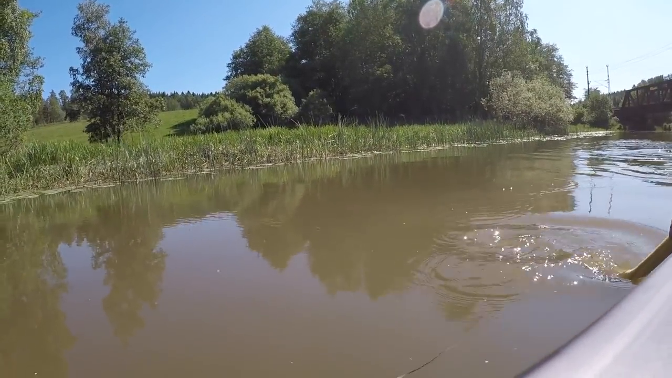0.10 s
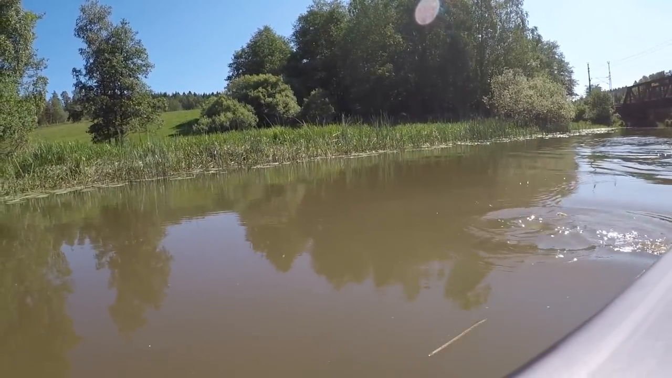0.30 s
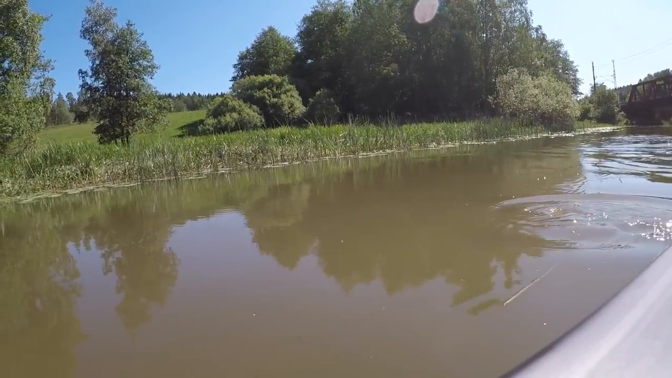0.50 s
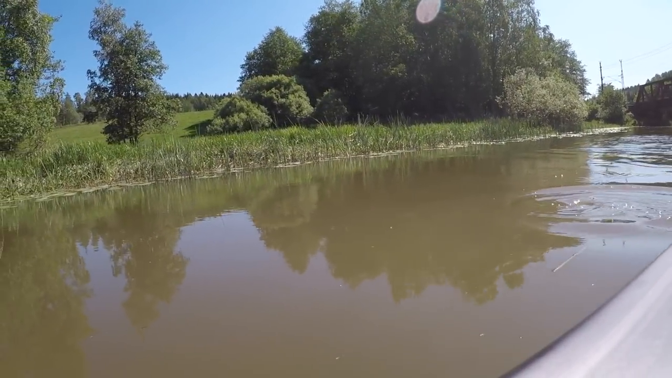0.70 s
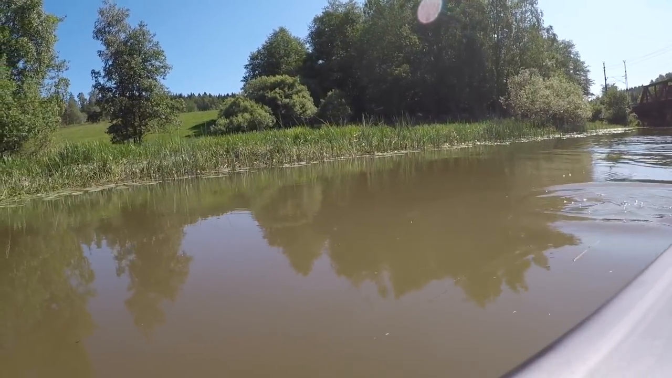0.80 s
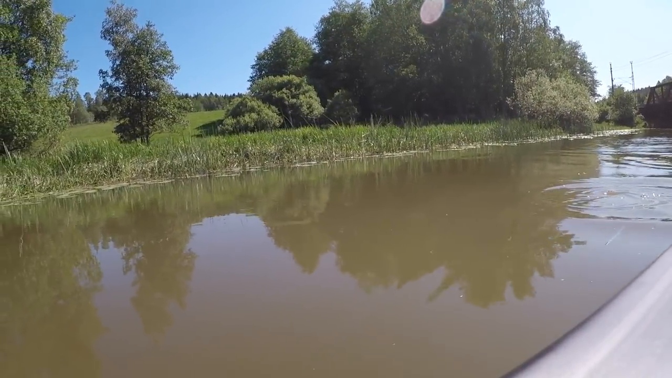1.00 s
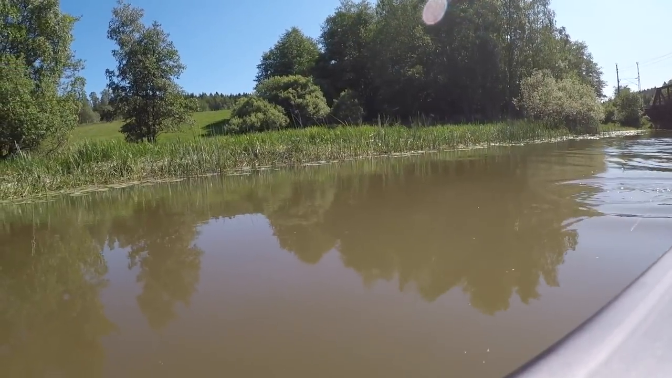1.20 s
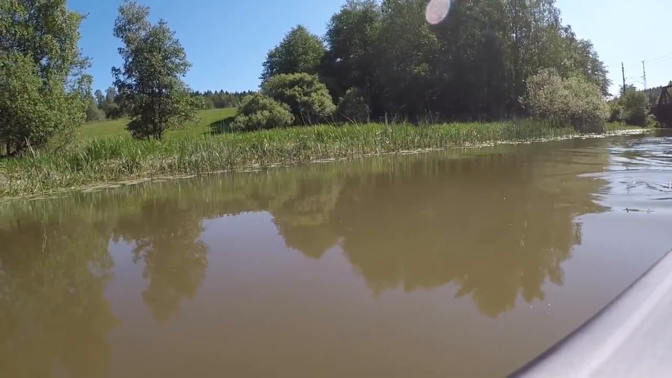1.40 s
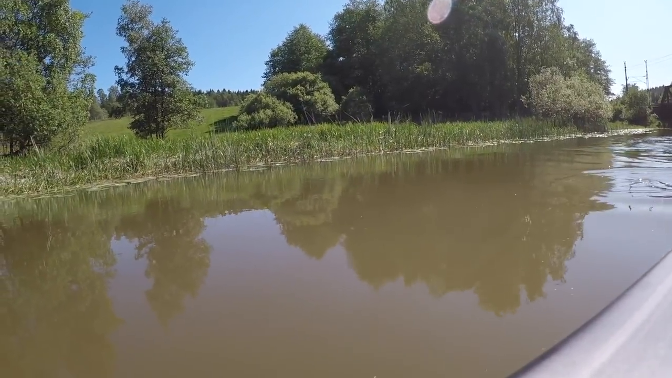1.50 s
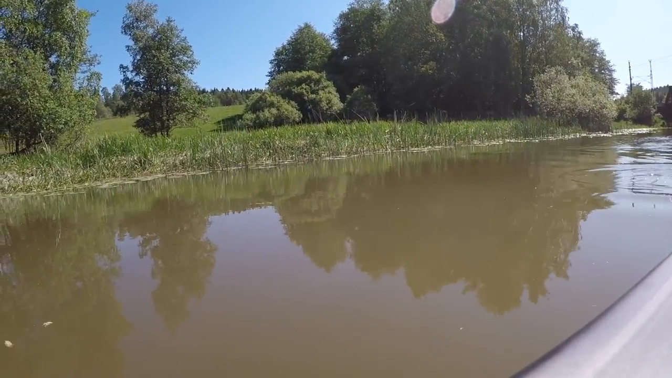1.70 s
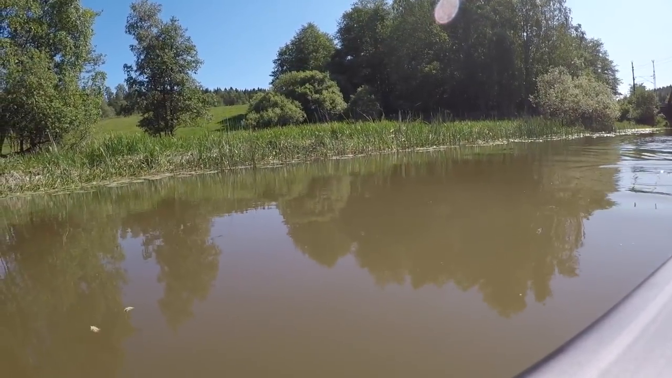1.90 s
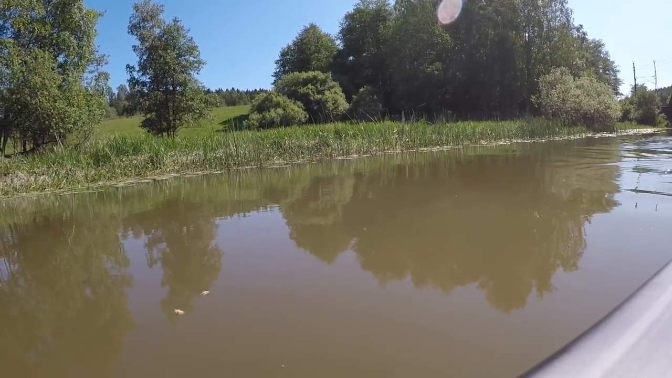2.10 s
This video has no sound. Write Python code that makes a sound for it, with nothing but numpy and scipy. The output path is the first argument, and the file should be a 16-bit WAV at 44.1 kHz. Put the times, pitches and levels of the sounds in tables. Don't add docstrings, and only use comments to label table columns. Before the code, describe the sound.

Paddle knock on a plastic canoe, heard close through the hull. Soft hiss, distant birds and faint touches until 0.25 s, when a hard crack booms hollowly and buzzes briefly; the hiss ducks, then slowly returns. From 0.33 to 0.64 s the shaft squeals low and rasps, then rubs bumpily, fading by 1.5 s. Duller taps at 1.65 and 1.8 s; faint chirps, low water slosh throughout.

```python
import sys
import numpy as np
from scipy import signal
from scipy.fft import rfft, irfft
from scipy.io import wavfile
from scipy.ndimage import uniform_filter1d

SR = 44100
rng = np.random.default_rng(int(sys.argv[2]) if len(sys.argv) > 2 else 0)


def invert_db(x):
    u = np.asarray(x, float) / 20
    return 10 ** u


def wav_record(signal):
    frames = np.transpose(np.atleast_2d(signal))
    bounded = np.clip(frames, -1, 1)
    quanta = np.round(bounded * 32767).astype(np.int16)
    wavfile.write(sys.argv[1], SR, quanta)


N = 92610

# f/Hz, level/dB, phase/rad
PORTS = [(95, -2.5, -.2), (150, -5, -.3), (228, -7, 2.0), (260, 0, 1.8), (330, -8, 1.6), (450, -7, 3.1),
         (560, -2.5, 3.05), (780, 0, 3.14), (1060, -1, 3.45), (1520, -2, 4.0)]
# f/Hz, left level/dB, t60/s
HULL_MODES = [(94, -10, 0.13), (143.9, -6.5, 0.13), (223.8, -1, 0.079), (260, -1.5, 0.078),
              (338.3, -7.5, 0.069), (434.3, 0.5, 0.027), (539, -8, 0.065), (608, -18, 0.12),
              (852, -13.5, 0.036), (1106, -20, 0.038), (1310, -16.5, 0.011), (1551, -30, 0.033),
              (1840, -25, 0.0067)]
# f/Hz, level/dB
AIR_MID = [(35, -62.5), (60, -65), (150, -4), (257, -1.5), (309, -6), (389, -6.5), (2190, -20), (9590, -26),
           (14900, -41.5)]
AIR_SIDE = [(35, -63.5), (60, -13), (120, -3), (295, 4), (407, -6.5), (489, 1), (832, -5.5), (9590, -26.5),
            (14900, -35)]
# t/s, level/dB, hardness/dB (lift of the modes above 400 Hz)
DRAG = [(0, -61, 0), (.2, -46.5, -10), (0.269, -58, 7), (0.309, -47, 6), (0.336, -26.5, 0),
        (0.598, -26.5, 9), (.78, -29.5, 4.5), (.84, -34.5, 3), (0.892, -28.5, 1), (1.03, -32.5, -5.5),
        (1.15, -38, 1.5), (1.3, -33.5, -4.5), (1.5, -46.5, -17), (1.6, -49, -6), (1.7, -37.5, -3),
        (1.851, -34, -2), (1.969, -55.5, -36), (2.1, -40.5, 7)]
# t/s, level/dB
SLOSH = [(0, -75), (.2, -63.5), (.25, -35.5), (.3, -49.5), (.45, -45.5), (.8, -49), (1.05, -41),
         (1.3, -45.5), (1.52, -42.5), (1.6, -53.5), (1.699, -44), (1.9, -52), (2.1, -60)]
# t/s, tap level/dB, tap f/Hz, boom level/dB, boom f/Hz
KNOCKS = [(.004, -37.5, 330, -36.5, 199), (.078, -47, 330, -41, 149.7), (.183, -42, 260, -36.5, 155.7),
          (0.233, -39, 524, -34, 154), (.2545, 1, 620, -3, 226), (0.245, -15.5, 440, -16, 148),
          (.265, -33, 1100, -23, 257), (0.295, -26.5, 610, -16.5, 206), (.327, -21, 617, -7.5, 234.8),
          (.332, -37, 557, -11, 222), (.603, -25, 514, -53, 159), (.632, -45, 560, -25.5, 269),
          (.66, -27.5, 506, -53, 257), (.725, -27, 610, -24, 243), (.962, -30, 530, -26, 254.6),
          (1.09, -48, 417, -43, 91.8), (1.198, -40, 420, -43, 267), (1.22, -40, 400, -39, 96),
          (1.512, -57, 400, -45.5, 85), (1.922, -52, 400, -35.5, 166), (0.391, -31, 507, -25, 232),
          (.415, -28, 510, -23, 226), (.442, -29, 507, -23.5, 245), (.543, -15, 495, -21, 246),
          (0.622, -24, 510, -25, 260.6), (0.678, -24, 480, -24.5, 257), (.748, -24.5, 564, -26, 237),
          (0.773, -24.5, 360, -39, 267), (0.867, -23, 820, -31.5, 93.2), (0.927, -20.5, 570, -33, 265),
          (0.991, -35, 507, -23.5, 240), (1.28, -35, 440, -33.5, 259), (1.302, -39, 450, -32.5, 259.5),
          (1.346, -38, 444, -34.5, 267), (1.437, -26.5, 432, -35.5, 264.6), (1.542, -42, 414, -38, 260),
          (1.6463, -12.5, 414, -14.5, 261), (1.652, -31, 480, -23, 254.3), (1.697, -25.5, 694, -27, 248),
          (1.8048, -16, 644, -22.5, 263.5), (1.806, -17, 455, -26, 150)]
# f/Hz, t60/s
BOOM_T60 = [(100, 0.23), (160, 0.063), (226, 0.078), (262, 0.1)]
# t/s, length/s, f/Hz, left level/dB, right level/dB
BRUSH = (.2465, .0045, 200, -20, -11)
# t/s, level/dB
RIM_RINGS = [
    (1.651, -48),
    (1.808, -56),
]
# t/s, length/s, start f/Hz, end f/Hz, level/dB, bend (over 1 glides early)
NEAR_BIRDS = [(.695, .03, 6200, 6200, -68, 1), (.985, .035, 6150, 6130, -63, 1),
              (1.02, .025, 6150, 6100, -68, 1), (1.045, .09, 5850, 5300, -62, 2.2),
              (1.297, .046, 6115, 6110, -51, 1), (1.33, .08, 6110, 6105, -63, 1),
              (1.409, .017, 5500, 6150, -60, 4), (1.426, .04, 5900, 4650, -59, .8),
              (1.46, .035, 5400, 5050, -66, 2), (1.567, .034, 4850, 5330, -62, 4),
              (1.596, .022, 5330, 5050, -62, .4), (1.624, .019, 3550, 2800, -58, 1.2),
              (1.49, .017, 2950, 3500, -62, 1)]
# t/s, length/s, start f/Hz, end f/Hz, level/dB
FAR_BIRDS = [
    (.01, 0.061, 6700, 6970, -63),
    (0.069, 0.048, 6100, 5110, -57.5),
    (1.22, 0.021, 3580, 3310, -63.5),
    (1.504, 0.021, 2870, 2540, -59),
    (1.666, 0.042, 6930, 7060, -64),
    (1.744, 0.088, 3870, 3520, -62),
    (1.799, 0.015, 3400, 3130, -60.5),
]
# t/s, length/s, f/Hz, level/dB, right phase/rad
DRONES = [
    (.45, .56, 4385, -75, 0),
    (1.24, .52, 968, -51, 2.3),
    (1.3, .8, 2255, -69, 0),
]
# t/s, f/Hz, left level/dB
SQUEAL = [
    (0.321, 531, -60),
    (0.334, 532, -24),
    (.44, 546.4, -19),
    (.498, 514.5, -22),
    (0.542, 510, -21),
    (0.554, 449.6, -22),
    (.57, 462, -16),
    (.586, 458, -27),
    (.64, 478, -34),
]
# ratio to the fundamental, level/dB
SQUEAL_OVERTONES = [(1.446, -13), (1.999, -25)]
# f/Hz, width/Hz, level/dB
RASP = [
    (970, 230, -57),
    (1568, 380, -57.5),
]

OPPOSED = np.array([[1], [-1]])


def walk(rate):
    k = int(SR / rate)
    held = np.repeat(rng.standard_normal(N // k + 1), k)
    return 1.31 * uniform_filter1d(uniform_filter1d(held, k), k)[:N]


def curve(x, table, column=1):
    rows = np.array(table).T
    return np.interp(x, rows[0], rows[column])


def bandpass(x, hz, order=4):
    return signal.sosfilt(signal.butter(order, hz, "band", fs=SR, output="sos"), x)


def pair(z, right_db, phase):
    return np.array([z.imag, (z * invert_db(right_db) * np.exp(1j * phase)).imag])


def felt(z, hz):
    return pair(z, curve(hz, PORTS), curve(hz, PORTS, 2))


def ring_hull(push, hard_db, deep_db=0):
    out = 0
    for hz, db, t60 in HULL_MODES:
        turn = np.exp(2j * np.pi * hz / SR)
        soft = np.exp(-hz / SR / 0.72)
        drive = push * invert_db(db + hard_db * (hz > 400) + deep_db * (hz < 120))
        z = signal.lfilter([1], [1, -turn * invert_db(-60 / t60 / SR)], drive)
        z = signal.lfilter([(1 - soft) ** 2], np.poly([turn * soft] * 2), z)
        out = out + felt(z, hz)
    return out


def air(shape, db):
    f = np.arange(N // 2 + 1) * SR / N + 1
    hz, level = np.array(shape).T
    noise = rfft(rng.standard_normal(N)) * invert_db(np.interp(np.log(f), np.log(hz), level))
    out = 0
    for k in range(18):
        band = np.clip(1 - abs(2 * np.log2(f / 45) - k), 0, 1)
        out = out + invert_db(1.2 * walk(9)) * irfft(noise * band, N)
    return out * invert_db(db) / np.std(out)


def gain_duck(t):
    u = np.maximum(t - 0.2607, 0)
    fall = 1 - np.exp(-u / 0.011)
    quick_db = -35 * np.exp(-u / 0.042)
    slow_db = -8 * np.exp(-(u / 0.77) ** 2)
    return invert_db(fall * (quick_db + slow_db))


def drag(t):
    slips_per_s, spread_db = 1500, 3.5
    chance = rng.random((3, N))
    slips = (chance[0] < slips_per_s / SR) * np.sign(chance[1] - .5)
    slips = slips * invert_db(-spread_db * np.log(chance[2] + 0.025))
    slips *= invert_db(curve(t, DRAG) + 2 * walk(25) - 15)
    return ring_hull(slips, curve(t, DRAG, 2), curve(t, SLOSH) + 48)


def slosh(t):
    low = bandpass(rng.standard_normal((2, N)), [22, 63.7], 2)
    both = low[0] + 0.39 * low[1] * OPPOSED
    return both / np.std(low) * invert_db(curve(t, SLOSH) + 1.1 * walk(7.5))


def rattle(t):
    start_s, end_s, fade_s = .256, .308, 0.0035
    gate = np.clip(np.minimum(t - start_s, end_s - t) / fade_s, 0, 1)
    buzz = bandpass(rng.standard_normal(N), (650, 1550)) * gate
    return invert_db(-37) * buzz * np.array([[1], [-.6]])


def brush(t):
    s, length, hz, left_db, right_db = BRUSH
    thud = np.exp(-((t - s) / length) ** 2 + 2j * np.pi * hz * (t - s))
    return pair(invert_db(left_db) * thud, right_db - left_db, 1.6)


def rim_rings(t):
    rim_hz, length_s = 1480, 0.0055
    out = np.zeros((2, N))
    for s, db in RIM_RINGS:
        ring = np.exp(-((t - s) / length_s) ** 2 + 2j * np.pi * rim_hz * t)
        out += pair(invert_db(db + 3 * walk(420)) * ring, -2, 1.4)
    return out


def knocks(t):
    tap_cycles, boom_rise_s = 1.25, 0.0025
    out, push, click = np.zeros((2, N)), np.zeros(N), np.zeros(N)
    for s, tap_db, tap_hz, boom_db, boom_hz in KNOCKS:
        u, after = t - s, np.maximum(t - s, 0)
        tap = np.exp(-(u * tap_hz / tap_cycles) ** 2 * 2 + 2j * np.pi * (tap_hz * u - .25))
        out += felt(invert_db(tap_db) * tap, tap_hz)
        swell = (1 - np.exp(-after / boom_rise_s)) ** 2 * invert_db(-60 * after / curve(boom_hz, BOOM_T60))
        boom = 2 * invert_db(boom_db) * swell * np.exp(2j * np.pi * boom_hz * after)
        out += felt(boom, boom_hz)
        click[int(s * SR)] += invert_db(2.4 * tap_db - 7)
        push[int(s * SR)] += invert_db(min(tap_db, -7) - 13.5)
    crack = bandpass(click, (800, 3100)) + 2 * bandpass(click, (800, 1500))
    crack = crack + invert_db(-15) * bandpass(click, (4200, 6500))
    return out + crack * np.array([[1], [-.15]]) + ring_hull(push, 17.8)


def birds(t):
    out = np.zeros((2, N))
    calls = [(*b, .006) for b in NEAR_BIRDS] + [(*b, 2.2, .05) for b in FAR_BIRDS]
    for s, length, hz0, hz1, db, bend, wobble in calls:
        u = np.clip((t - s) / length, 0, 1)
        hz = (hz1 + (hz0 - hz1) * (1 - u) ** bend) * (1 + wobble * walk(900))
        whistle = np.sin(np.pi * u) ** 0.49 * np.exp(2j * np.pi * np.cumsum(hz) / SR)
        out += pair(invert_db(db + 2.0 * walk(72)) * whistle, 6.3, 0.44)
    return out


def drones(t):
    out = np.zeros((2, N))
    for s, length, hz, db, phase in DRONES:
        gate = np.sin(np.pi * np.clip((t - s) / length, 0, 1)) ** 0.039
        level = invert_db(db + 4.7 * walk(30.13)) * gate
        turn = 2j * np.pi * np.cumsum(hz * (1 + 0.00635 * walk(41.27))) / SR
        out += pair(level * np.exp(turn), -2.3, phase)
    return out


def squeal(t):
    hz = curve(t, SQUEAL) * (1 + 0.023 * walk(89))
    turn = 2j * np.pi * np.cumsum(hz) / SR
    tone = felt(np.exp(turn) * invert_db(3 * walk(109.8)), 481)
    for ratio, db in SQUEAL_OVERTONES:
        tone = tone + pair(invert_db(db + 3 * walk(90)) * np.exp(ratio * turn), 0, np.pi)
    s, _, db = np.array(SQUEAL).T
    return tone * invert_db(np.interp(t, s, db, -120, -120))


def rasp(t):
    start_s, hold_to_s, fade_s = .325, 0.45, 0.12
    gate = (t > start_s) * np.exp(-np.maximum(t - hold_to_s, 0) / fade_s)
    noise, out = rng.standard_normal((2, N)), 0
    for hz, width, db in RASP:
        band = bandpass(noise, [hz - width / 2, hz + width / 2], 3)
        out = out + (band[0] + 0.15 * band) / np.std(band) * gate * invert_db(db + 1.2 * walk(46))
    return out


def scene():
    t = np.arange(N) / SR
    hiss = air(AIR_MID, -52.5) + OPPOSED * air(AIR_SIDE, -49.5)
    blows = knocks(t) + rattle(t) + brush(t) + rim_rings(t)
    bank = birds(t) + drones(t)
    return gain_duck(t) * hiss + drag(t) + slosh(t) + blows + bank + squeal(t) + rasp(t)


def roll_off(x):
    return signal.sosfilt(signal.butter(12, 15020, fs=SR, output="sos"), x)


def record(dry):
    mix = dry / (1 + dry ** 8) ** (1 / 8)
    return roll_off(mix)


dry = scene()
out = record(dry)
wav_record(out)
```